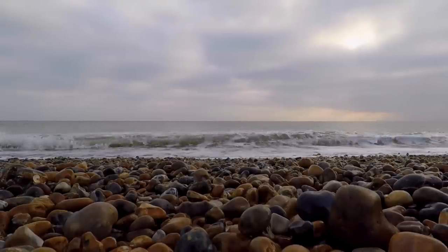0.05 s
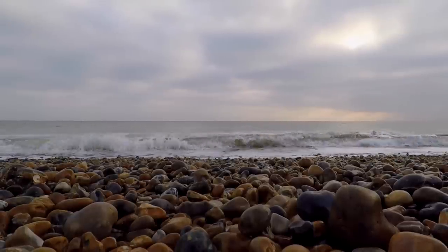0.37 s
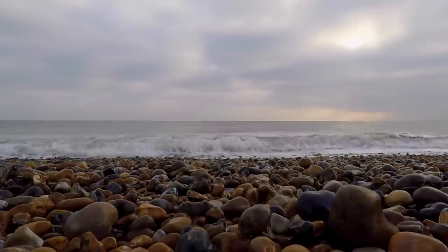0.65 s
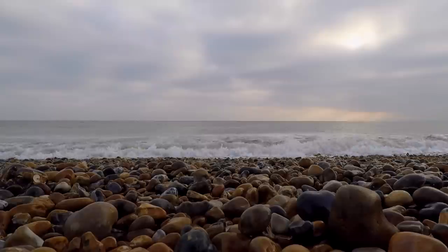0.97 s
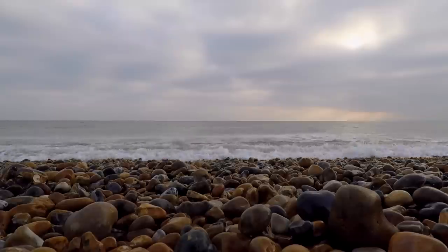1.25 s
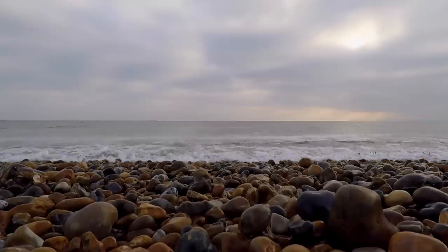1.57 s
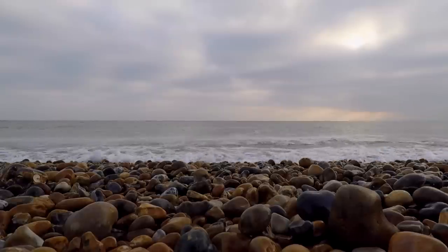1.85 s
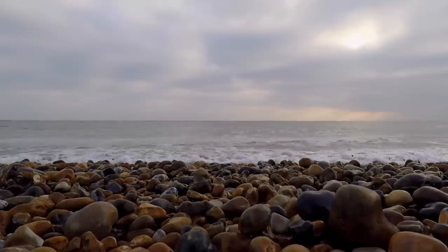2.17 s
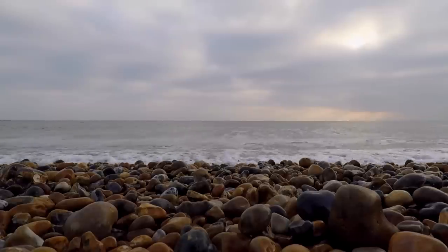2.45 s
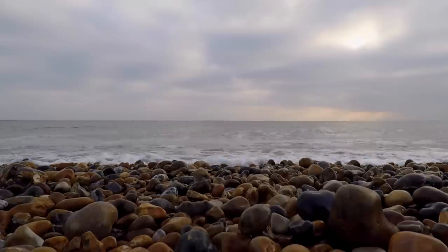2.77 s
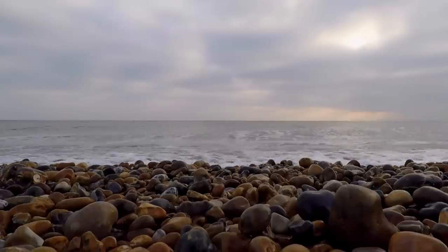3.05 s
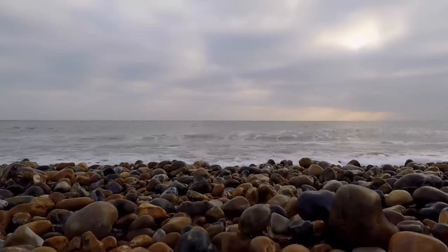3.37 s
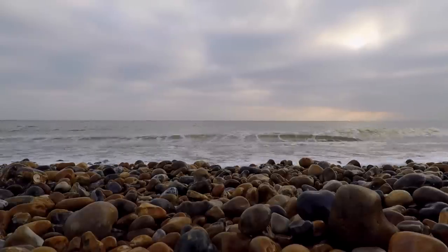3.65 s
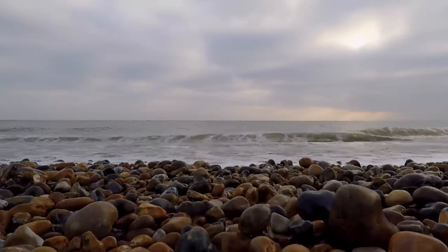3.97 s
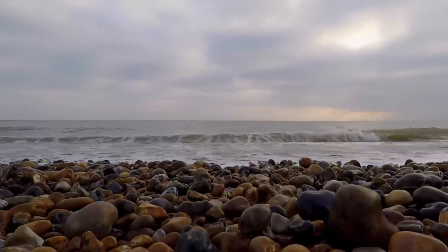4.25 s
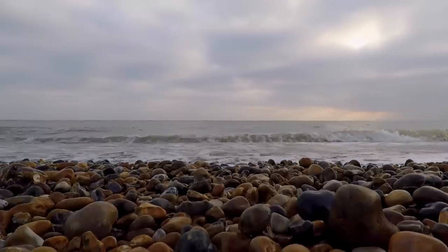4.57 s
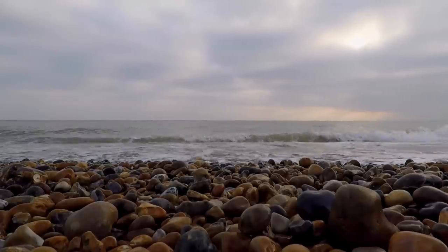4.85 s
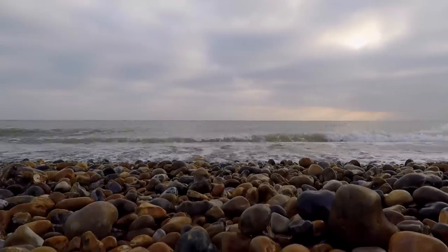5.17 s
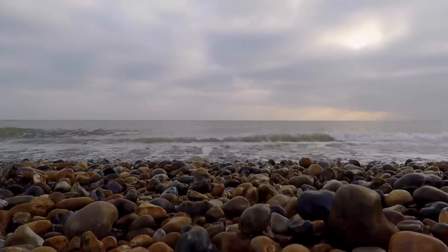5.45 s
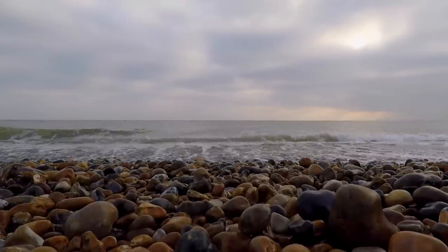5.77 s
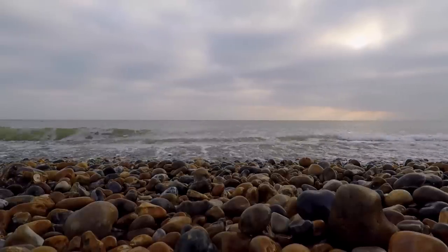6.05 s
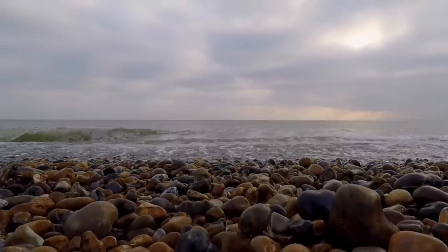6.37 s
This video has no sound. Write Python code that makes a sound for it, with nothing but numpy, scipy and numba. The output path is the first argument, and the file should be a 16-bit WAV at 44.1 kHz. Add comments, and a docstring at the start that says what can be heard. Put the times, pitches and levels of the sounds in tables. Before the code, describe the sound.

Small waves break on a pebble beach while heavy, gusty wind rumbles on the microphone throughout, over a low hum. From the start a breaker roars and foams, with dull thuds of falling water in the first second and stones hissing and clicking on the right. Water begins running up the beach at about 1.2 seconds. It is strongest from 2.1 to 2.8 seconds, churning and bubbling close on the left with a few hollow slops, as the pebble hiss moves toward the middle. More surges follow from 3.2 seconds, with a cluster of small plops between 3.6 and 3.9. At about 4.3 seconds another wave collapses further out, followed by others near 5.1 and 5.8, each roaring with soft low thuds. The hum sinks briefly near 5.7 seconds, while a last wash builds over the rolling stones through to about 6.5 seconds.

```python
"""Small waves on a shingle beach

Breakers roar and foam further out, and falling water traps clouds of air that thud. Close on the left
the swash churns up ringing bubbles and slops over air pockets, while rolling stones hiss and click.
Wind eddies rumble on the microphone's two ports over a low hum; a limiter holds the bass in check."""
import sys
import numpy as np
from scipy import signal
from scipy.fft import rfft, irfft, next_fast_len
from scipy.io import wavfile
from scipy.ndimage import uniform_filter1d, minimum_filter1d
from numba import njit

SR = 44100
rng = np.random.default_rng(int(sys.argv[2]) if len(sys.argv) > 2 else 0)


def materialize(psi):
    """Save the field psi as 16-bit PCM at rate SR to the path in sys.argv[1].

    A 1-D psi becomes a single channel; in a 2-D psi each row is a channel.
    """
    bounded = np.clip(np.atleast_2d(psi).T, -1, 1)
    quanta = np.round(bounded * 32767).astype(np.int16)
    wavfile.write(sys.argv[1], SR, quanta)


N = 291501
TIME = np.arange(N) / SR
FFT_SIZE = next_fast_len(N + 4096)
FREQS = np.maximum(np.arange(FFT_SIZE // 2 + 1) * SR / FFT_SIZE, 1)
PORT_LAG_S = .00016  # sound from the side reaches the far port this much later
TOP_HZ = 15620

# Spectra of a breaker's three noises: frequency_hz, relative_db
ROAR_SPECTRUM = [(70, -25), (130, 4.5), (190, 0), (290, -1.5), (400, -3.5), (550, -10.5), (900, -23),
                 (2000, -35)]
FOAM_SPECTRUM = [(400, -30), (600, 0.5), (760, -0.5), (950, -1.5), (1150, -3), (1450, -10.5), (2200, -18.5),
                 (3500, -23.5), (7000, -41)]
SPRAY_SPECTRUM = [(800, -25), (1200, -3), (1500, 3), (2000, -10.5), (3000, -9.5), (6000, -23)]
# Collapsing crests: start_s, roar_hold_s, roar_db, foam_db, foam_rise_s, spray_over_foam_db
CRESTS = [(-.25, .85, -22.7, -30.8, .8, -13), (.65, .9, -32, -29.4, 1.0, -19),
          (3.93, .25, -35.5, -37.3, .25, -5), (4.33, .2, -25.3, -32, .28, -8),
          (5.1, .2, -25.2, -37.4, .2, -6), (5.75, .7, -25, -36.5, .4, -7)]
def breakers():
    """Incoherent addition: the roar, foam and spray of overlapping breakers each sum in power."""
    roaring = foaming = spraying = 0
    for start, hold, roar_db, foam_db, foam_rise, spray_db in CRESTS:
        froth = swell(start, foam_rise, hold_s=.35, fade_s=1.7) * undb(foam_db)
        collapse = swell(start, rise_s=.2, hold_s=hold, fade_s=3.2) * undb(roar_db)
        roaring = np.hypot(roaring, collapse)
        foaming = np.hypot(foaming, froth)
        spraying = np.hypot(spraying, froth * undb(spray_db))
    roar = colour(port_noise(0.77, lag_s=-0.00022), ROAR_SPECTRUM, flicker_db=1.4, rate_hz=22)
    foam = colour(port_noise(0.79, phase_rad=2.54), FOAM_SPECTRUM, flicker_db=1.0, rate_hz=26)
    spray = colour(port_noise(0.67, phase_rad=2.2), SPRAY_SPECTRUM, flicker_db=2.0, rate_hz=28)
    return (unit_rms(pan(roar, db=-8), 140, 420) * roaring
            + unit_rms(pan(foam, db=-4), 650, 1500) * foaming
            + unit_rms(pan(spray, db=-1), 1000, 3000) * spraying)


# Water running up the beach: start_s, rise_s, hold_s, fade_s, water_db, stones_db
WASHES = [(-.45, .45, .3, .7, -40.5, -39.9), (.1, .75, .4, 2.4, -51, -37.8), (1.2, .35, .3, .7, -32.5, -45),
          (1.82, .25, .15, .4, -36, -42.5), (2.13, .19, .11, .4, -26.3, -34.9),
          (2.42, .1, .09, .34, -25.6, -36.2), (2.6, .12, .55, .3, -33.8, -37.1),
          (2.88, .1, .2, .3, -42, -40), (3.15, .14, .14, .12, -29.6, -34.1),
          (3.42, .07, .24, .5, -32, -43.7), (3.78, .15, .05, .55, -30.5, -48.5),
          (3.88, .36, .38, .6, -45, -40.5), (4.78, .15, .03, .13, -31, -41.4),
          (4.95, .15, .3, .6, -43, -47.3), (5.0, .9, .17, 2.3, -33.6, -40.5)]
def wash_levels():
    """Power summation: washes add to a resting level of flowing water and of rolling stones."""
    flow, rolling = undb(-41), undb(-46.5)
    for start, rise, hold, fade, water_db, stones_db in WASHES:
        wash = swell(start, rise, hold, fade)
        flow = np.hypot(flow, wash * undb(water_db))
        rolling = np.hypot(rolling, wash * undb(stones_db))
    return flow, rolling


# Spectra of churning water and of its deep surge: frequency_hz, relative_db
CHURN_SPECTRUM = [(130, 3), (250, -3), (480, -12.5), (780, -6), (1100, -9.5), (1600, -19), (2200, -19),
                  (5000, -32)]
SURGE_SPECTRUM = [(110, -12), (180, -1), (280, 1.5), (430, -11.5), (700, -12), (1200, -23)]
def swash(flow):
    """Air entrainment: water running up on the left churns in bubbles that ring with rising pitch."""
    churn = colour(port_noise(0.44, lag_s=PORT_LAG_S), CHURN_SPECTRUM, flicker_db=1.5, rate_hz=28)
    bubbles = grains(per_s=600, low_hz=445, high_hz=1682, cycles=26.5, spread_db=3.5,
                     side=0.32, glide=0.089)
    surge = colour(port_noise(1.0, lag_s=PORT_LAG_S), SURGE_SPECTRUM, flicker_db=3.5, rate_hz=24)
    # only a heavy mass of water sounds deep, so the bass grows faster than the flow
    depth = undb(0.5) * np.sqrt(flow / flow.max())
    water = (undb(-1.5) * unit_rms(churn, 600, 1500)
             + undb(-4.5) * unit_rms(bubbles, 600, 1500)
             + pan(depth * unit_rms(surge, 140, 420), db=11.5))
    return pan(water * flow, db=-2.5)


# Water slapping into hollows: start_s, relative_peak_db, pitch_hz, t60_s, closing_s, note_over_splash_db
AIR_POCKETS = [(2.322, -8.7, 806, 0.086, 0.011, 1), (2.52, -7, 763, 0.23, 0.022, 0),
               (2.568, -14.5, 1000, .16, .012, -10), (3.583, -16, 730, .035, 0.0027, 4),
               (3.632, -17, 800, .2, .008, -8), (3.668, -13, 890, 0.041, 0.0048, 5),
               (3.676, -18.5, 1330, 0.056, .003, 6), (3.717, -12.5, 855, 0.022, 0.0017, -8),
               (3.774, -12, 700, 0.051, 0.0064, 5), (3.84, -17, 823, .04, 0.0036, 5),
               (3.88, -19, 1250, .06, .005, -10)]
def slops():
    """Cavity resonance: water closes on an air pocket with a splash, and it rings with a rising note."""
    out = np.zeros((2, N))
    age = np.arange(SR // 4) / SR
    lag = int(PORT_LAG_S * SR)
    for start, peak_db, hz, t60, closing, note_db in AIR_POCKETS:
        pocket = signal.butter(3, [hz / 1.92, hz * 1.52], "band", fs=SR, output="sos")
        splash = signal.sosfilt(pocket, rng.standard_normal(len(age)))
        note = np.sin(2 * np.pi * hz * age * (1 + 0.68 * age))
        envelope = np.minimum(age / closing, 1) * undb(-60 * np.maximum(age - closing, 0) / t60)
        burst = (splash / splash.std() + undb(note_db) * note) * envelope
        burst *= undb(peak_db - 1.5) / abs(burst).max()
        for channel in range(2):
            i = int(start * SR) + channel * lag
            out[channel, i:i + len(age)] += burst
    return pan(out, db=0)


# Heavy lumps of falling water: start_s, level_db, pitch_hz, length_s
FALLING_WATER = [(.065, -20, 147, .08), (.185, -19, 159, .07), (.375, -21, 225, .06),
                 (.455, -20.5, 152, .07), (.61, -23, 220, .06), (.68, -21, 137, .07),
                 (.79, -19.5, 234, .07), (.865, -20, 152, .06), (2.548, -20, 253, .06),
                 (3.63, -21, 257, .04), (3.648, -16, 150, .07), (4.582, -20, 151, .06),
                 (4.735, -20, 127, .07), (4.88, -20, 148, .06), (4.962, -23.5, 250, .05),
                 (5.38, -19.5, 134, .07), (5.535, -20, 128, .07), (5.945, -21, 136, .06),
                 (6.04, -20.5, 146, .06), (6.16, -22, 249, .055), (6.222, -21, 141, .06)]
def thuds():
    """Collective oscillation: air trapped by falling water throbs as one cloud amid dull churning."""
    out = np.zeros((2, N))
    for start, level_db, hz, length in FALLING_WATER:
        size = int(length * SR)
        age = np.arange(size) / SR
        cloud = signal.butter(2, [hz / 1.26, hz * 1.78], "band", fs=SR, output="sos")
        churn = signal.sosfilt(cloud, rng.standard_normal(SR // 4))[-size:]
        throb = np.sqrt(2) * np.sin(2 * np.pi * (hz * age + rng.random()))
        envelope = np.sin(np.pi * (np.arange(size) / size) ** .7)  # an arch that peaks early
        burst = undb(level_db) * envelope * (throb + undb(-5) * churn / churn.std())
        i = int(start * SR)
        out[:, i:i + size] += burst[:N - i]
    return pan(out, db=0.5)


# Spectrum of rolling stones: frequency_hz, relative_db
STONE_SPECTRUM = [(900, -1), (1700, 3), (2600, 0.5), (4000, -1), (5500, -2.5), (7500, -5), (9000, -6.5),
                  (12000, -11), (15500, -14.5)]
# Path of the hiss along the shore: time_s, left_minus_right_db
HISS_PATH = [(0.0, -14), (0.4, -21), (1.1, -9.5), (1.84, -13), (1.97, -2.5), (2.38, 3), (2.7, -1),
             (3.25, 4.5), (3.7, -.5), (4.25, 1.5), (5.5, -3), (6.0, 2), (6.6, -6.5)]
def shingle(flow, rolling, drain_s=.25, fizz_db_per_db=.3):
    """Superposition: countless stone impacts and bursting bubbles merge into hiss; near stones click."""
    pan_db = np.interp(TIME, *np.transpose(HISS_PATH))
    leftness = .5 + .5 * np.tanh((pan_db + 5.5) / 2.9)
    from_left, from_right = port_noise(0.37, lag_s=PORT_LAG_S), port_noise(0.074, lag_s=-PORT_LAG_S)
    hiss = np.sqrt(leftness) * from_left + np.sqrt(1 - leftness) * from_right
    clicks = grains(per_s=2200, low_hz=3500, high_hz=15000, cycles=6, spread_db=2.9,
                    side=2 * leftness - 1)
    clicks = filtered(clicks, np.sqrt(FREQS / 7000))  # a hard contact is short, so it is bright
    stones = colour(hiss + undb(-9) * clicks, STONE_SPECTRUM, flicker_db=1.17, rate_hz=60)
    stones = pan(stones, pan_db) / np.sqrt(undb(pan_db) + undb(-pan_db))  # equal power at every bearing
    stones *= undb(0.22 * wander(rate_hz=48))  # stones tumble in small bunches
    # wet stones fizz in the top octave; wetness lags the flow, as water takes time to drain
    retention = np.exp(-1 / (drain_s * SR))
    wetness = flow[0] + signal.lfilter([1 - retention], [1, -retention], flow - flow[0])
    wet_db = 20 * np.log10(wetness)
    fizz = filtered(stones, 1 / (1 + (8500 / FREQS) ** 6))
    stones += fizz * (undb(fizz_db_per_db * (wet_db - wet_db.mean())) - 1)
    return unit_rms(stones, 3000, 8000) * rolling


# Spectra of large and of small eddies: frequency_hz, relative_db
RUMBLE_SPECTRUM = [(10, -3.5), (28, 2), (48, 0.5), (66, -2), (90, -11.5), (150, -21), (400, -64)]
BUFFET_SPECTRUM = [(45, -36), (75, 3), (100, 0), (140, -5.5), (200, -9.5), (400, -25.5), (900, -43)]
# Gusts on the microphone: start_s, hold_s, large_eddies_db, small_eddies_db
GUSTS = [(-.35, .3, -32, -24), (.2, .15, -21, -22), (.6, .1, -20, -37), (1.35, 0.32, -22, -27.5),
         (2.0, .15, -14.5, -38), (3.2, .12, -15.5, -24), (3.8, .1, -35, -26), (4.45, .2, -23, -22),
         (4.75, .25, -14.5, -27.5), (5.3, .1, -28, -22), (5.9, .35, -22, -23)]
def wind():
    """Turbulent pressure: large eddies rumble on both ports almost alike; small ones buffet higher up."""
    large, small = undb(-21), undb(-28)  # the steady wind between gusts
    for start, hold, large_db, small_db in GUSTS:
        gust = swell(start, rise_s=.35, hold_s=hold, fade_s=1.7)
        large = np.hypot(large, gust * undb(large_db))
        small = np.hypot(small, gust * undb(small_db))
    rumble = colour(port_noise(0.96), RUMBLE_SPECTRUM, flicker_db=0.3, rate_hz=14)
    buffet = colour(port_noise(0.97), BUFFET_SPECTRUM, flicker_db=1.2, rate_hz=20)
    return (unit_rms(pan(rumble, db=-1.5), 18, 62) * large
            + unit_rms(pan(buffet, db=-3.5), 82, 150) * small)


def hum(pitch_hz=71.7, dip_db=9):
    """Amplitude and phase modulation: a low tone wavers slightly and sinks in level once."""
    level_db = -21.5 - dip_db * swell(start_s=4.5, rise_s=1.2, hold_s=.4, fade_s=.55)
    phase = 2 * np.pi * pitch_hz * TIME + 0.12 * wander(rate_hz=4.2)
    level_db += 0.52 * wander(rate_hz=6.05)
    return pan(np.sqrt(2) * np.sin(phase) * undb(level_db), db=-4.5)


def undb(db):
    """Amplitude ratio of a level in decibels."""
    return 10 ** (np.asarray(db) / 20)


def pan(x, db):
    """Level difference: the left channel gains db over the right."""
    return x * undb(np.array([[.5], [-.5]]) * db)


def filtered(x, gain):
    """Fast convolution: the spectrum is multiplied by a gain at each of FREQS."""
    return irfft(rfft(x, FFT_SIZE) * gain, FFT_SIZE)[..., :N]


def unit_rms(x, low_hz, high_hz):
    """Normalisation: the mean of the two channels gets rms 1 within a band."""
    return x / np.std(filtered(x.mean(0), (FREQS > low_hz) & (FREQS < high_hz)))


def swell(start_s, rise_s, hold_s, fade_s):
    """Exponential decay after a linear rise to 1 and a hold: 20 dB down in each fade_s."""
    age = TIME - start_s
    return np.clip(age / rise_s, 0, 1) * undb(-20 * np.maximum(age - rise_s - hold_s, 0) / fade_s)


def wander(rate_hz):
    """Low-pass noise: random steps smoothed twice, with a spread near 1."""
    step = int(SR / rate_hz)
    steps = np.repeat(rng.standard_normal(N // step + 1), step)
    return 1.3 * uniform_filter1d(uniform_filter1d(steps, step), step)[:N]


def colour(x, spectrum, flicker_db, rate_hz):
    """Spectral shaping, with independent amplitude modulation in each octave."""
    hz, db = np.transpose(spectrum)
    octave = np.log2(FREQS / hz[0])
    shaped = rfft(x, FFT_SIZE) * undb(np.interp(octave, np.log2(hz / hz[0]), db))
    out = 0
    for k in range(int(np.log2(hz[-1] / hz[0])) + 2):
        band = irfft(shaped * np.maximum(1 - abs(octave - k), 0), FFT_SIZE)[:, :N]
        out = out + band * undb(flicker_db * wander(rate_hz))
    return out


def port_noise(coherence, phase_rad=0, lag_s=0):
    """Partial coherence: the right port shares some of the left's noise, phase-shifted and delayed."""
    left, own = rng.standard_normal((2, N))
    shared = filtered(left, np.exp(-1j * (phase_rad + 2 * np.pi * FREQS * lag_s)))
    return np.array([left, coherence * shared + np.sqrt(1 - coherence ** 2) * own])


@njit
def ring(start, hz, cycles, amplitude, lag, glide):
    """Damped oscillation: gliding sines die away, reaching the right port lag samples late."""
    out = np.zeros((2, N))
    for k in range(len(start)):
        length, phase = int(cycles[k] * SR / hz[k]), 0.
        for i in range(length):
            progress = i / length
            phase += 2 * np.pi * hz[k] * (1 + glide * progress) / SR
            pressure = amplitude[k] * np.exp(-6 * progress) * np.sin(phase)
            left, right = int(start[k]) + i, int(start[k] + lag[k]) + i
            if left < N and 0 <= right < N:
                out[0, left] += pressure
                out[1, right] += pressure
    return out


def grains(per_s, low_hz, high_hz, cycles, spread_db, side, glide=0):
    """Shot noise: small rings at random times, a few loud, scattered about a side (1 left, -1 right)."""
    when, pitch, life, size, bearing = rng.random((int(per_s * N / SR), 5)).T
    start = when * (N - 1)
    hz = low_hz * (high_hz / low_hz) ** pitch
    lag = PORT_LAG_S * SR * (np.broadcast_to(side, N)[start.astype(int)] + bearing - .5)
    amplitude = undb(-spread_db * np.log(1 - .995 * size))
    out = ring(start, hz, cycles * (.5 + life), amplitude, lag, float(glide))
    return out / out.std()


def bass_limiter(x, edge_hz=240, drive_db=3.7, ceiling=.45, hold_s=.03):
    """Peak limiting: the bass is boosted, then turned down around each peak that passes the ceiling."""
    bass = filtered(x, 1 / (1 + (FREQS / edge_hz) ** 4))
    driven = bass * undb(drive_db)
    allowed_gain = ceiling / np.maximum(abs(driven).max(0), ceiling)
    hold = int(hold_s * SR)
    return x - bass + driven * uniform_filter1d(minimum_filter1d(allowed_gain, hold), hold)


def scene():
    """Linear superposition of shore, wind and hum; the same washes move the water and the stones."""
    flow, rolling = wash_levels()
    return wind() + hum() + breakers() + swash(flow) + slops() + shingle(flow, rolling) + thuds()


def record(dry):
    """Limiting and saturation: the recorder holds the bass, rounds the highest peaks and cuts the top."""
    held = bass_limiter(dry)
    rounded = held / (1 + (held / .95) ** 6) ** (1 / 6)
    return signal.sosfilt(signal.ellip(10, .2, 80, TOP_HZ, fs=SR, output="sos"), rounded)


dry = scene()
out = record(dry)
materialize(out)
```